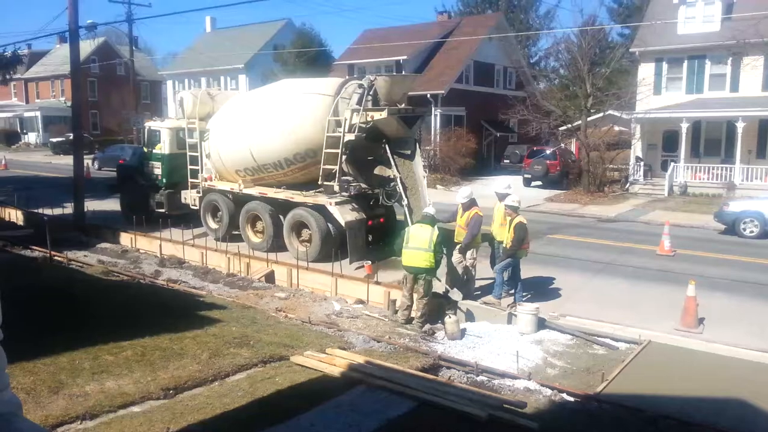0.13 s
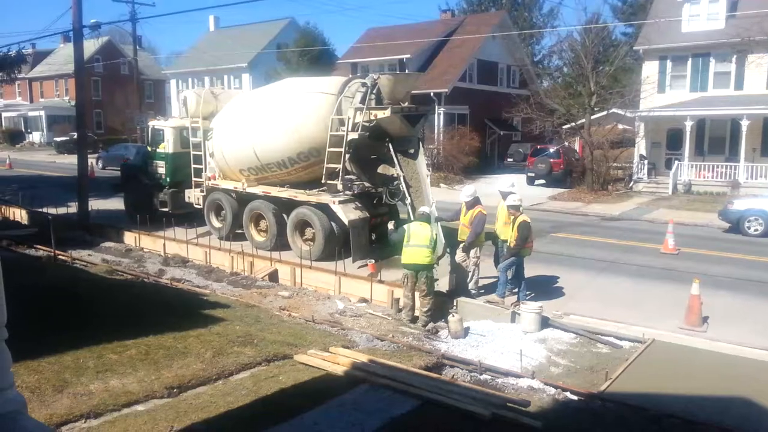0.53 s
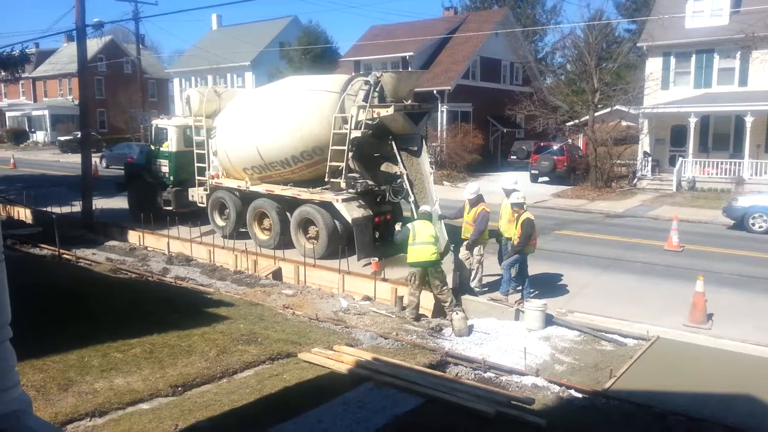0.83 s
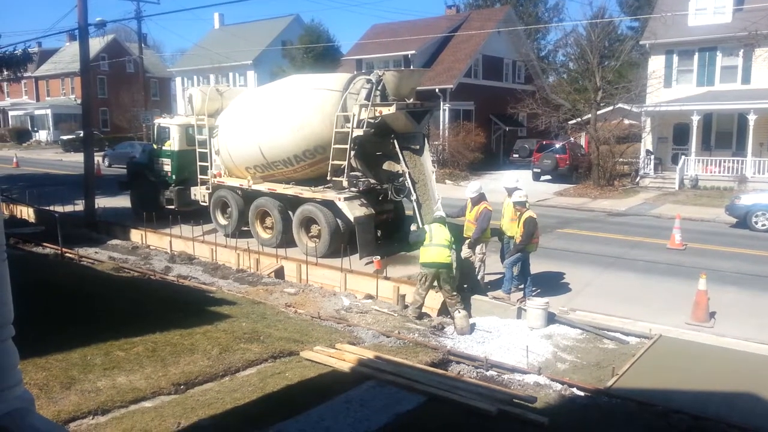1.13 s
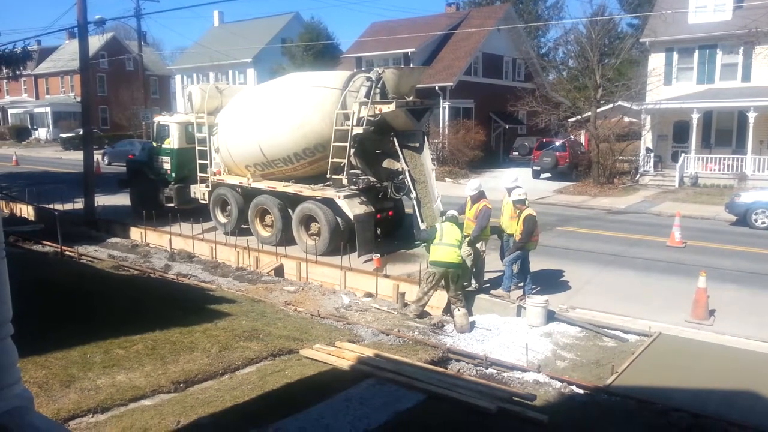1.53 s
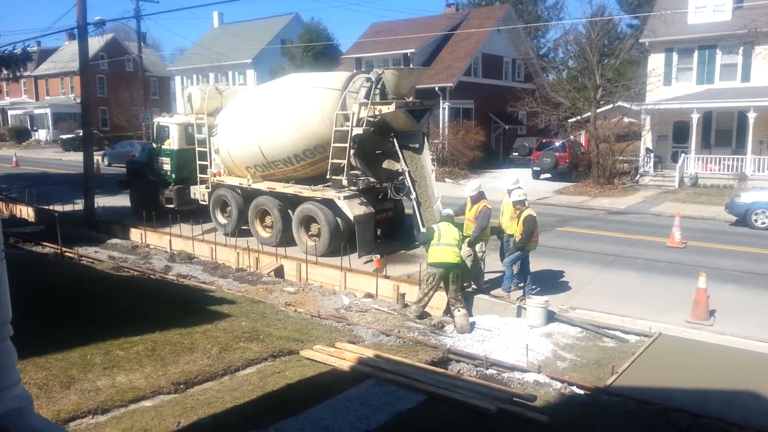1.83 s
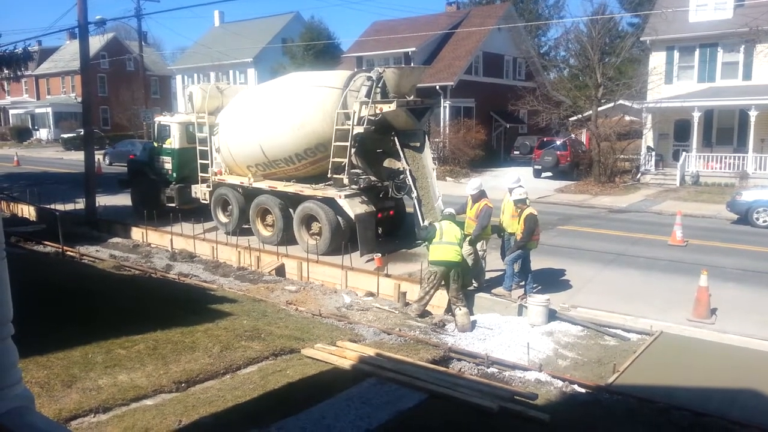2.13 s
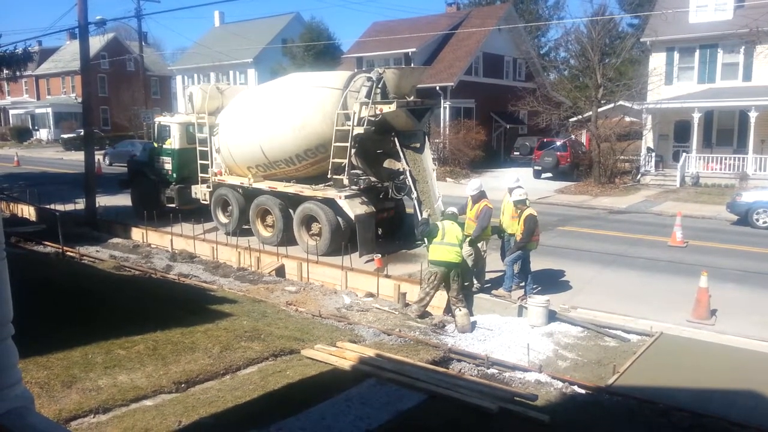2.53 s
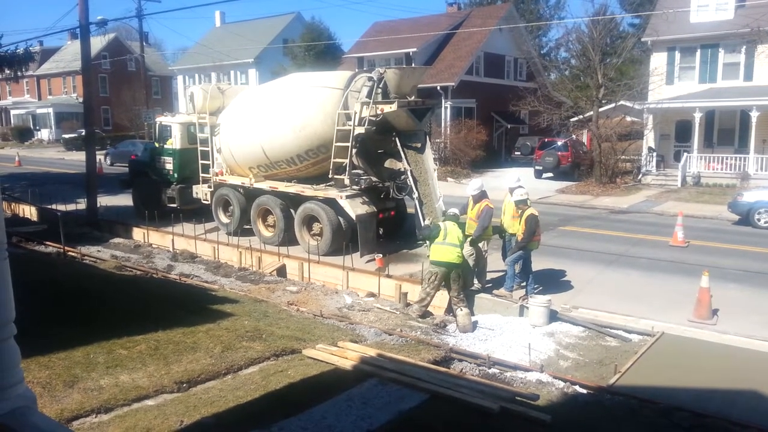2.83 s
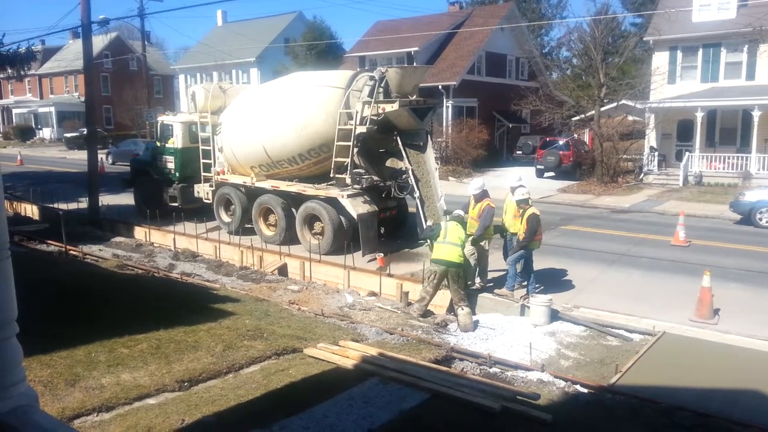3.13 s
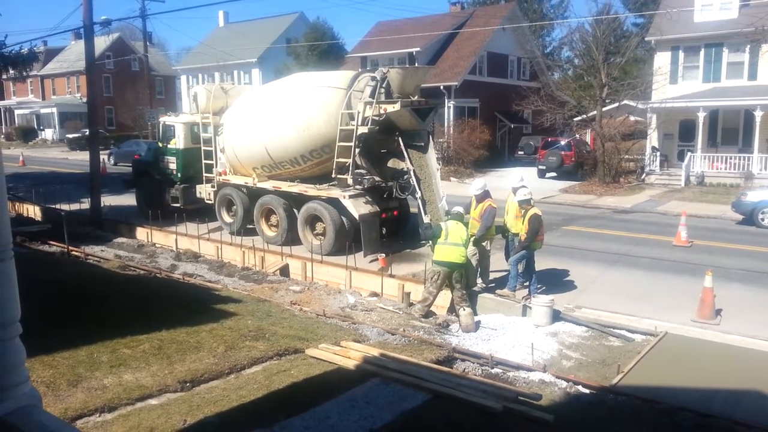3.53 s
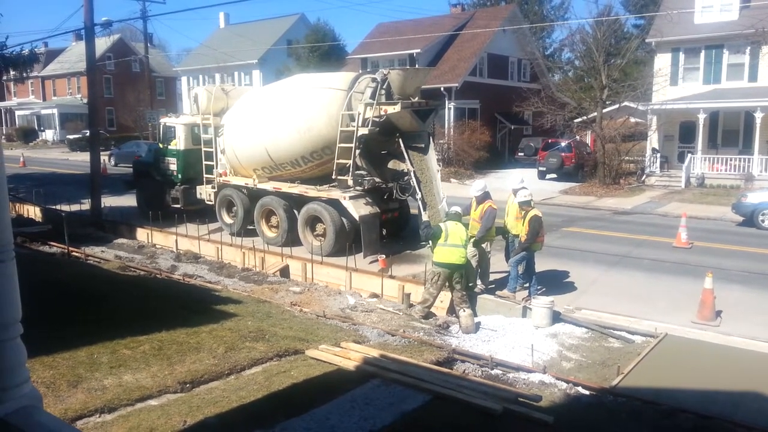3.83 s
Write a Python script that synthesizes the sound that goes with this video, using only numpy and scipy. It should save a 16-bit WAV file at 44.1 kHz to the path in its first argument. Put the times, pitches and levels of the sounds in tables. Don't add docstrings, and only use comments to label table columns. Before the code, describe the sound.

A concrete mixer truck roars steadily across a street while wet gravel tumbles in its drum.

```python
import sys
import numpy as np
from scipy import signal
from scipy.fft import rfft, irfft
from scipy.io import wavfile
from scipy.ndimage import uniform_filter1d

SR = 44100
rng = np.random.default_rng(int(sys.argv[2]) if len(sys.argv) > 2 else 0)


def invert_db(x):
    u = np.asarray(x, float) / 20
    return 10 ** u


def wav_out(sig):
    wavfile.write(sys.argv[1], SR, np.round(np.clip(np.atleast_2d(sig).T, -1, 1) * 32767).astype(np.int16))


N = 176400
T = np.arange(N) / SR

FIRING_HZ = 86.8
LEFT_LAG_S = 0.00039

# [t/s, level/dB, length/s]
WIND_PUFFS = [
    (0.66, -37, 0.04),
    (.81, -37, 0.04),
    (2.137, -43.5, 0.036),
]
# [f/Hz, level/dB,
# width/Hz]
PUMP_TONES = [(97.6, -52.5, 1.5), (183, -41, 17), (229.5, -46, 33), (320, -40.5, 74), (355.3, -45, 10),
              (745, -46, 4.7), (916, -44, 10), (438, -45, 20), (4630, -37.5, 260), (1183, -49, 15),
              (2140, -44.5, 360), (3900, -39, 480)]
# [t/s, level/dB, f/Hz]
SHELL_THUDS = [(0.684, -32, 191), (0.774, -28, 358), (0.887, -30, 307), (0.982, -26, 353), (1.26, -31, 266),
               (1.351, -25, 191), (1.473, -25, 202), (1.765, -25, 326), (1.927, -28, 258),
               (2.168, -26, 188), (2.288, -27, 277), (2.393, -26, 318), (2.475, -28, 299),
               (2.601, -26, 191), (2.744, -27, 323), (2.881, -31, 296), (3.071, -28, 240),
               (3.171, -31, 226), (3.35, -29, 253), (3.468, -28, 210), (3.753, -28, 199), (3.828, -26, 320),
               (3.934, -27, 304)]
# [t/s, level/dB, f/Hz, time to fall 60 dB/s]
STEEL_CLINKS = [(.71, -41, 2842, .9), (1.45, -51, 2842, .6), (2.16, -39, 2842, 1.2), (2.87, -49, 2842, .6),
                (3.6, -44, 2842, 1.1), (1.612, -36, 1785, .17), (1.69, -39, 1778, 0.35),
                (1.6, -49, 6965, 0.3), (1.6, -56, 10216, .3), (1.6, -58, 13521, .4), (3.1, -50, 6968, .5),
                (3.17, -54, 6968, .3), (3.012, -36, 1450, .12), (3.018, -38, 1950, .1),
                (3.025, -39, 2300, .09), (3.05, -39, 1400, .1), (3.308, -35, 4000, 0.1),
                (3.312, -34, 4450, .12), (3.32, -36, 4800, .1)]
# [t/s, level/dB]
TUMBLING = [(0.8, -35.5), (0.93, -35), (0.98, -37), (1.25, -35), (2.11, -36.5), (2.17, -35), (2.24, -37.5),
            (2.27, -35), (2.34, -37), (3.38, -34), (3.39, -36), (3.78, -35.5), (3.85, -37), (3.86, -36.5),
            (4.0, -36.5)]
# [t/s, strength/dB, length/s]
GRAVEL_SLUMPS = [(0.508, 6, 0.019), (0.68, 0, 0.07), (0.887, -4, 0.03), (1.17, -5, 0.028),
                 (1.385, -3, 0.04), (1.49, -4, 0.03), (2.15, -8, 0.04), (2.287, -3.5, 0.041),
                 (2.856, -10, 0.04), (3.017, -3, 0.054), (3.19, -7, 0.05), (3.303, -2, 0.024),
                 (3.57, -4, 0.029)]
# [f/Hz, level/dB]
GRAVEL_COLOUR = [(300, -30.5), (1000, -5), (2500, -9.5), (4300, -1.5), (5200, -6), (6300, -17), (8000, -16),
                 (13500, -23.5)]
CYLINDER_LEVELS = [-12, -4, -1, -9, -9, -14]
# [f/Hz, level/dB]
ROAR_COLOUR = [(30, -63), (60, -14.5), (130, -5), (200, 0), (340, 1), (400, -2.5), (800, -1), (1100, -7.5)]
# [multiple of firing rate, level/dB, left minus right/dB, flutter/dB]
ENGINE_TONES = [(1.5, -45.5, -0.5, 0.5), (1.667, -50, -1.5, 2.5), (2.667, -52, -2, 3), (3, -55, -3, 4.5),
                (3.167, -49.5, -2, 3), (3.5, -47, -2.5, 2), (5, -43, 2, 3.5), (5.333, -49, 8, 4),
                (5.5, -50.5, 2, 2.5), (6, -47.5, 0.5, 4.5), (7, -37, 2.5, 0.8), (7.333, -53, 1, 4.5),
                (8, -44.5, -13, 3.5), (9, -41.5, -1, 3), (9.333, -53, -9, 2), (9.667, -47, -2, 0),
                (10.833, -53.5, -13, 4.5)]
# [f/Hz, left minus right/dB]
LEFT_SHADE = [(60, -3), (450, 0.5), (800, -3), (1600, -3.5), (3000, -9.5), (4800, -19.5), (7000, -16.5),
              (10000, -26.5)]
# [f/Hz, likeness from 0 to 1]
PORT_LIKENESS = [(60, 0.79), (200, 1), (650, 0.78), (900, 0.56), (1150, 0.18), (3000, 0.15), (4800, 0.15),
                 (6000, 0.065)]
# [f/Hz, level over mean speck/dB]
LEFT_THRESHOLD = [(4500, -30), (6000, -8), (8500, -3), (11000, 3.5), (14500, 3)]
RIGHT_THRESHOLD = [(7000, -30), (9500, -6), (12000, 0), (13500, 4), (14500, 8)]
# [t/s, level/dB]
OPENING_FADE = [(0.423, -36), (0.431, -28.5), (0.45, -20), (.5, -13.5), (0.581, -6.5), (.7, -4), (.8, -3.5)]


def evened(x):
    return x / np.sqrt(np.mean(x ** 2, -1, keepdims=True) + 1e-20)


def read(points, hz):
    f, value = np.transpose(points)
    return np.interp(np.log(hz + 1), np.log(f + 1), value)


def shape(x, gain):
    return irfft(rfft(x) * gain(np.fft.rfftfreq(N, 1 / SR)), N)


def slow(lo_hz, hi_hz):
    f = np.geomspace(lo_hz, hi_hz, num=24)[:, None]
    phase = rng.random(24)[:, None]
    t = T[::64]
    waves = np.sin(2 * np.pi * (f * t + phase)) / np.sqrt(f)
    return np.interp(T, t, evened(waves.sum(0)))


def wind():
    puff_hz, breeze_db = 134, -78
    colour = lambda hz: (hz / (hz + 110)) ** 3 / (1 + (hz / puff_hz) ** 4)
    air = evened(shape(rng.standard_normal((2, N)), colour))
    puffs = sum(invert_db(db) * np.exp(-((T - s) / length) ** 2) for s, db, length in WIND_PUFFS)
    breeze = invert_db(breeze_db + 3.8 * slow(0.84, 21))
    return air * (breeze + puffs * invert_db([[-15], [0]]))


def pump():
    out = np.zeros((2, N))
    for hz, db, width in PUMP_TONES:
        resonance = lambda f: 1 / (1 + (2 * (f - hz) / width) ** 2)
        out += invert_db(db) * evened(shape(rng.standard_normal((2, N)), resonance))
    return out


def thuds():
    thud_db, rise_s, t60_s = -4, 0.012, 0.25
    out = np.zeros(N)
    for s, db, hz in SHELL_THUDS:
        u = np.maximum(T - s, 0)
        envelope = invert_db(thud_db + db - 60 * u / t60_s) * (1 - np.exp(-u / rise_s))
        out += envelope * np.sin(2 * np.pi * hz * u)
    return out


def clinks():
    rise_s, left_db = 0.0013, 7
    out = np.zeros(N)
    for s, db, hz, t60 in STEEL_CLINKS:
        u = np.maximum(T - s, 0)
        envelope = invert_db(db - 60 * u / t60) * np.minimum(u / rise_s, 1)
        out += envelope * np.sin(2 * np.pi * hz * u)
    return out * invert_db([[left_db], [0]])


def drum():
    gravel_db, slurry_db, tumble_db = -26, 3, 0.5
    stones_per_s, stone_spread_db, slump_rise_s = 4000, 3.5, 0.0049
    when, load_db = np.transpose(TUMBLING)
    effort = invert_db(np.interp(T, when, load_db) - load_db.mean() + tumble_db * slow(6, 30))
    for s, db, length in GRAVEL_SLUMPS:
        u = np.maximum(T - s, 0)
        swell = (1 - np.exp(-u / slump_rise_s)) * np.exp(-(u / length) ** 2)
        effort = effort + 0.46 * invert_db(db) * swell
    size = invert_db(stone_spread_db * np.minimum(rng.exponential(1, (2, N)), 5))
    size = size * np.sign(rng.standard_normal((2, N)))
    stones = evened(size * (rng.random((2, N)) < stones_per_s / SR))
    slurry = invert_db(slurry_db) * rng.standard_normal((2, N))
    gravel = shape((stones + slurry) * effort, lambda hz: invert_db(read(GRAVEL_COLOUR, hz)))
    return invert_db(gravel_db) * evened(gravel)


def roar_colour(hz):
    octaves_above = np.log2(np.maximum(hz / ROAR_COLOUR[-1][0], 1))
    return invert_db(read(ROAR_COLOUR, hz) - 4.5 * octaves_above)


def knocks(firings):
    knock_db, jitter_db, body_t60_s = -46, -2, 0.013
    fires = np.flatnonzero(np.diff(np.floor(firings)))
    jitter = jitter_db * rng.standard_normal(len(fires))
    strikes = np.zeros(N)
    strikes[fires] = invert_db(np.resize(CYLINDER_LEVELS, len(fires)) + jitter)
    body = rng.standard_normal((2, 2000)) * invert_db(-60 * T[:2000] / body_t60_s)
    ringing = signal.fftconvolve(strikes[None], body, axes=1)[:, :N]
    return invert_db(knock_db) * evened(shape(ringing, roar_colour))


def roar(firings):
    roar_db, patch_db, swell_db, pulse_depth = -28.5, 1.22, 0.95, 0.12
    hz, t, z = signal.stft(rng.standard_normal((2, N)), SR, nperseg=1024)
    patches = uniform_filter1d(rng.standard_normal(z.shape[1:]), size=10, axis=0)
    patches = uniform_filter1d(patches, size=5, axis=1)
    noise = signal.istft(z * invert_db(patch_db * patches / patches.std()), SR, nperseg=1024)[1][:, :N]
    pulses = 1 + pulse_depth * np.cos(2 * np.pi * firings)
    noise = noise * pulses * invert_db(swell_db * slow(3, 36))
    return invert_db(roar_db) * evened(shape(noise, roar_colour))


def engine_tones(firings):
    out = np.zeros((2, N))
    for k, db, left_db, flutter_db in ENGINE_TONES:
        lag = k * FIRING_HZ * LEFT_LAG_S * np.array([[1], [0]])
        wander = rng.random() + 0.014 * flutter_db * slow(1.5, 25)
        level = np.sqrt(2) * invert_db(db + flutter_db * slow(1.5, 25)) * invert_db([[left_db], [0]])
        out += level * np.cos(2 * np.pi * (k * firings - lag + wander))
    return out


def ports(x):
    same = lambda hz: np.clip(read(PORT_LIKENESS, hz), 0, 1)
    shade = lambda hz: invert_db(read(LEFT_SHADE, hz))
    delay = lambda hz: np.exp(-2j * np.pi * hz * LEFT_LAG_S)
    direct = shape(x[1], lambda hz: shade(hz) * same(hz) * delay(hz))
    reflected = shape(x[0], lambda hz: shade(hz) * np.sqrt(1 - same(hz) ** 2))
    return np.array([direct + reflected, x[1]])


def scene():
    speed_wobble = 0.00074
    firings = np.cumsum(FIRING_HZ * (1 + speed_wobble * slow(0.3, 3))) / SR
    truck = knocks(firings) + roar(firings) + pump() + drum() + clinks() + thuds()
    return ports(truck) + engine_tones(firings) + wind()


def low_pass(x):
    return signal.sosfilt(signal.butter(12, 14540, fs=SR, output="sos"), x)


def record(dry):
    hiss = invert_db([[-59.5], [-90]]) * rng.standard_normal((2, N))
    hz, t, z = signal.stft(dry + hiss, SR, "cosine", nperseg=2048)
    limit = invert_db([read(LEFT_THRESHOLD, hz), read(RIGHT_THRESHOLD, hz)])[..., None]
    strong = abs(evened(abs(z))) > limit
    kept = signal.istft(z * strong, SR, "cosine", nperseg=2048)[1][:, :N]
    s, db = np.transpose(OPENING_FADE)
    fade = invert_db(np.interp(T, s, db)) * (T > s[0])
    return low_pass(kept * fade)


dry = scene()
out = record(dry)
wav_out(out)
```